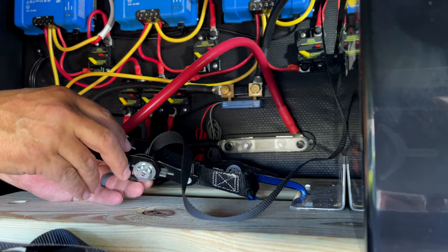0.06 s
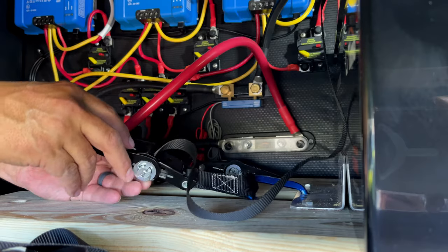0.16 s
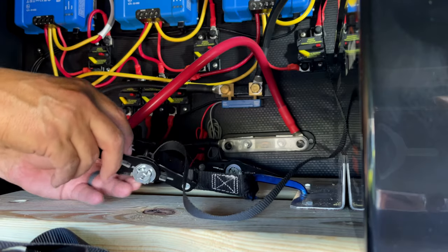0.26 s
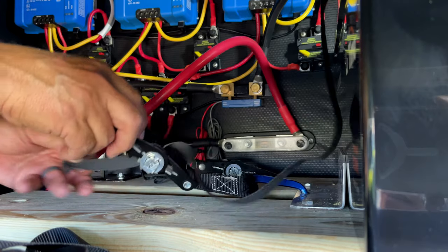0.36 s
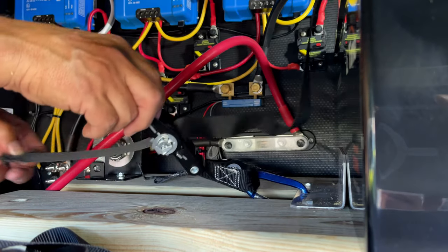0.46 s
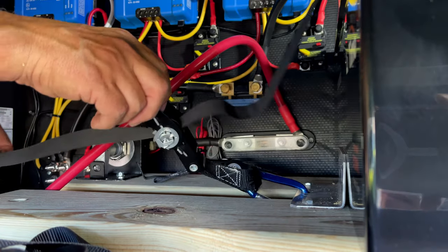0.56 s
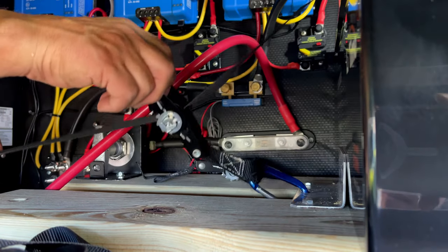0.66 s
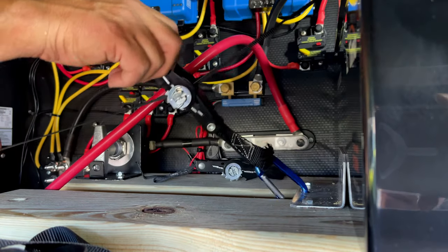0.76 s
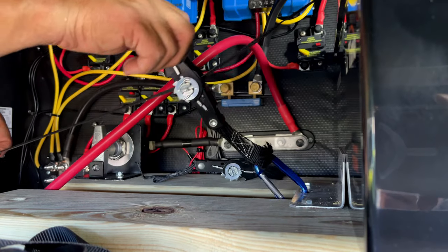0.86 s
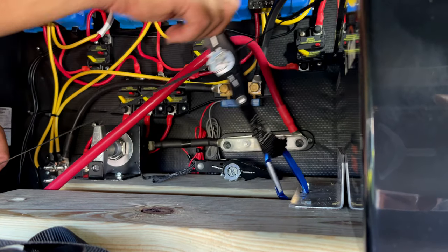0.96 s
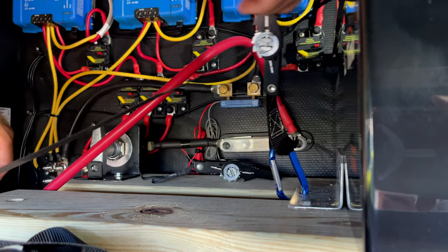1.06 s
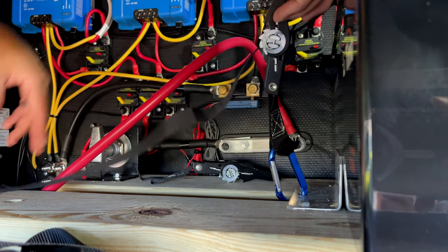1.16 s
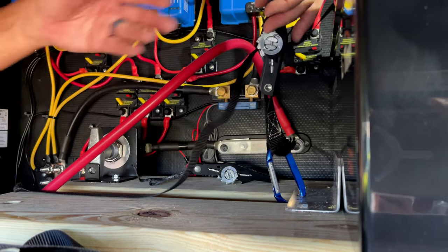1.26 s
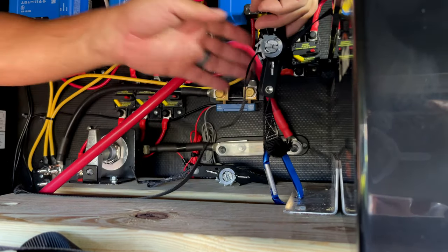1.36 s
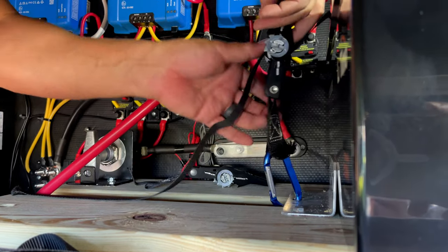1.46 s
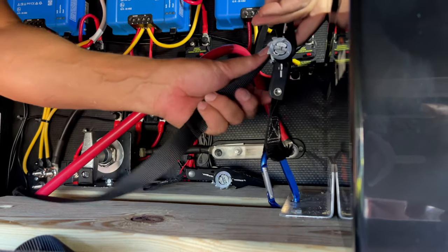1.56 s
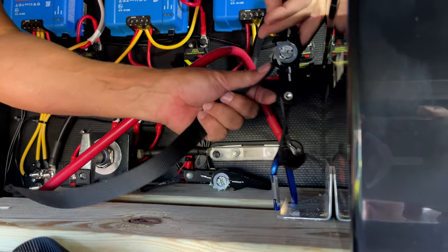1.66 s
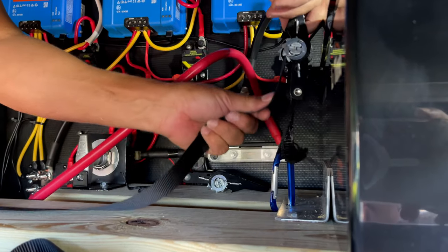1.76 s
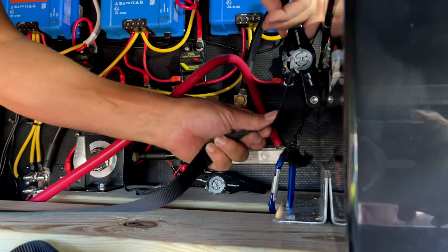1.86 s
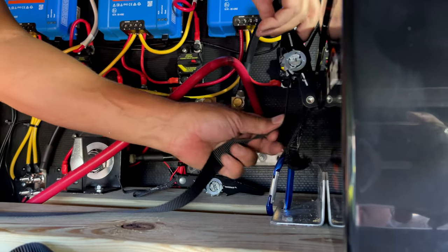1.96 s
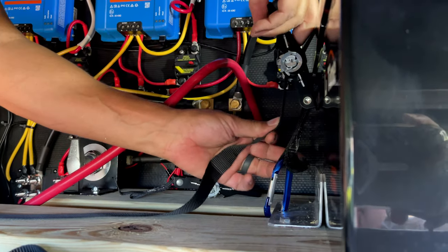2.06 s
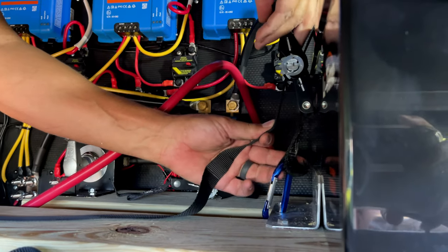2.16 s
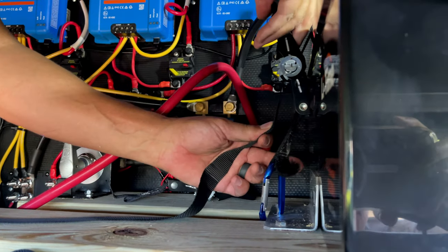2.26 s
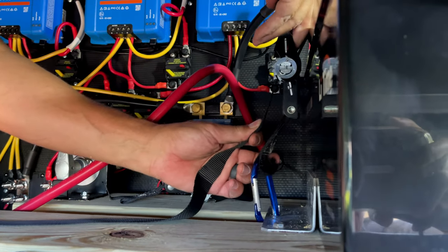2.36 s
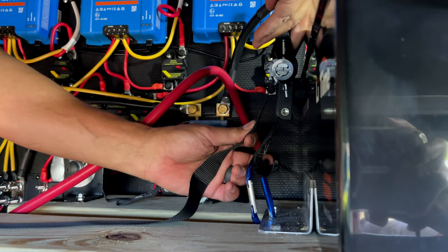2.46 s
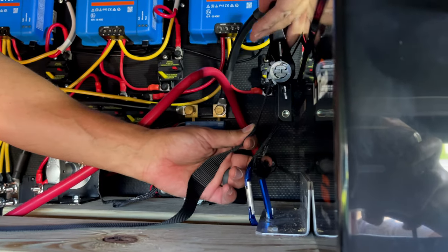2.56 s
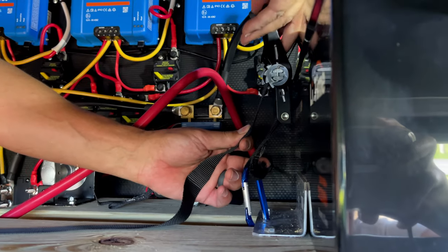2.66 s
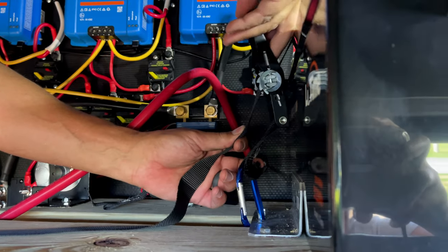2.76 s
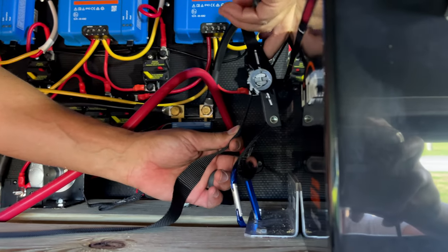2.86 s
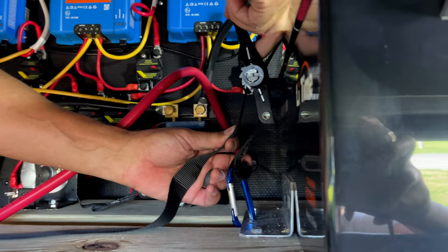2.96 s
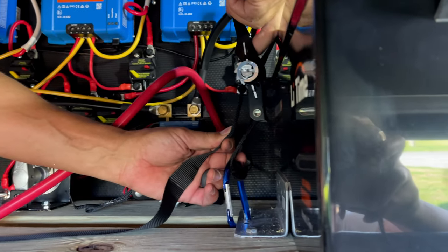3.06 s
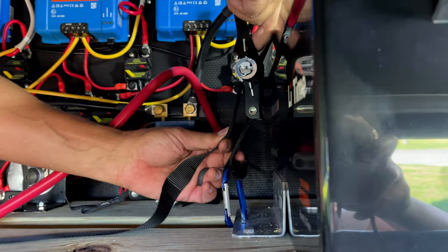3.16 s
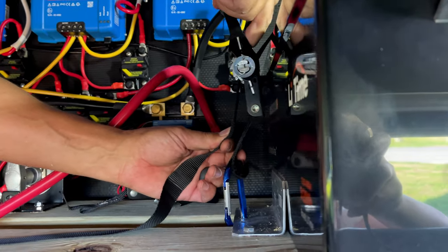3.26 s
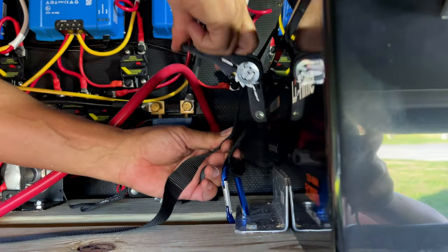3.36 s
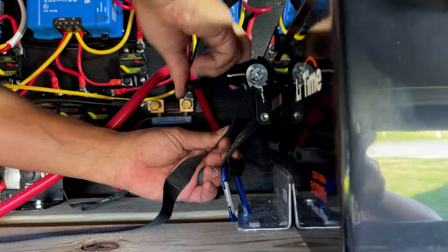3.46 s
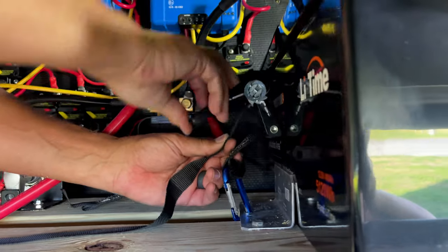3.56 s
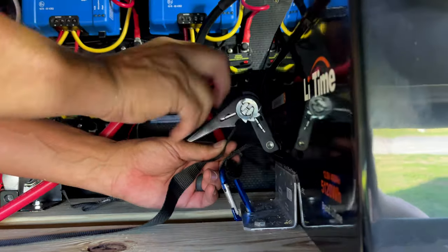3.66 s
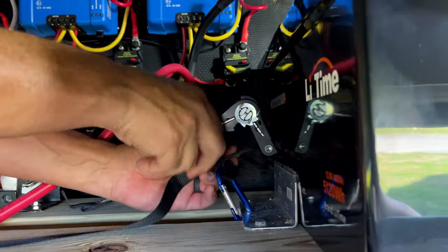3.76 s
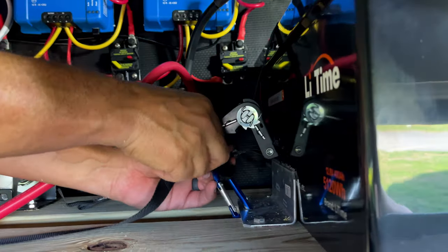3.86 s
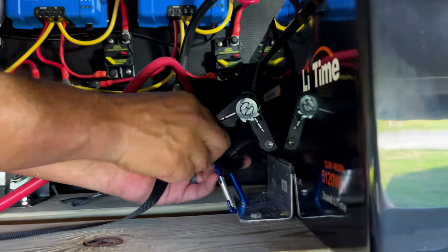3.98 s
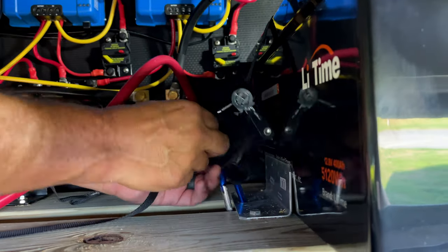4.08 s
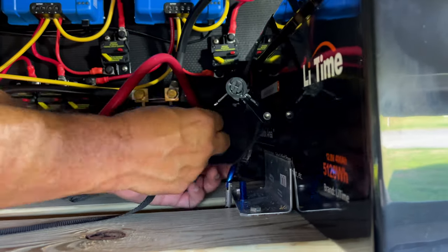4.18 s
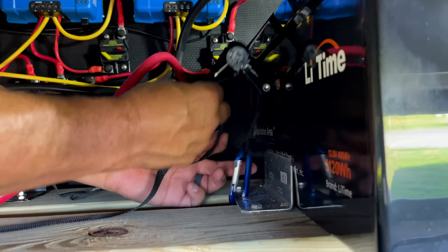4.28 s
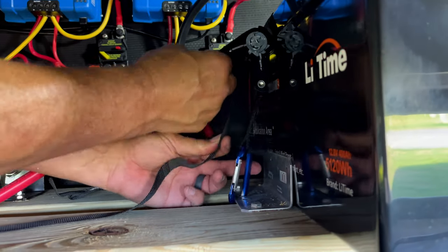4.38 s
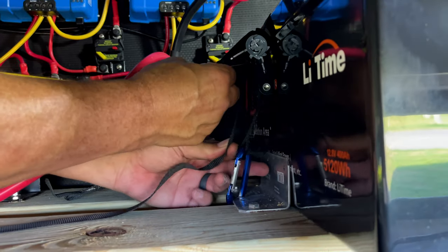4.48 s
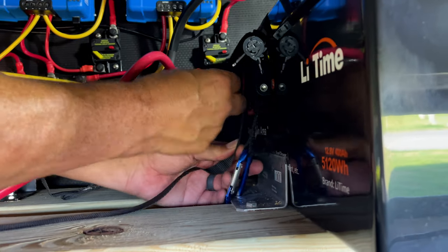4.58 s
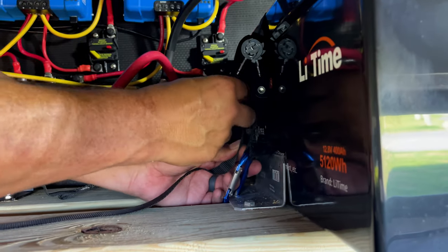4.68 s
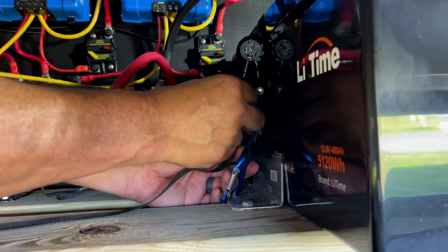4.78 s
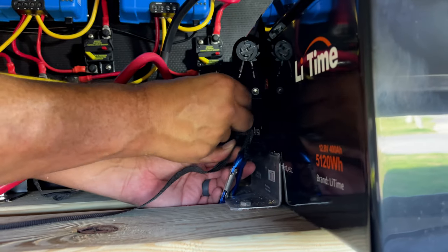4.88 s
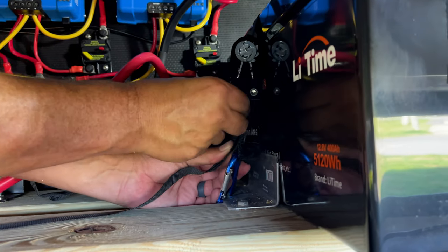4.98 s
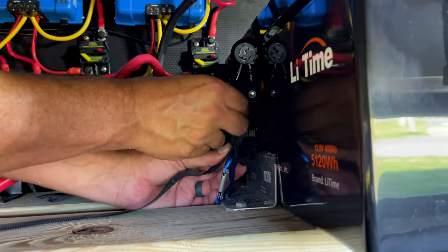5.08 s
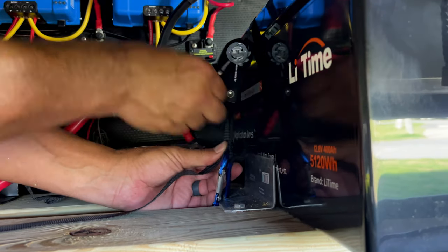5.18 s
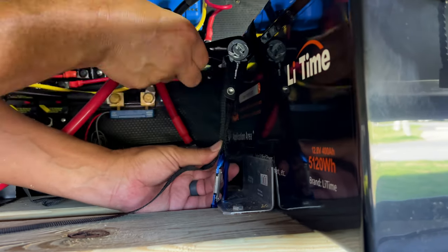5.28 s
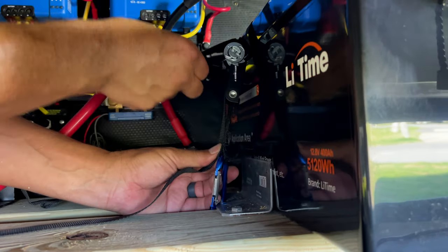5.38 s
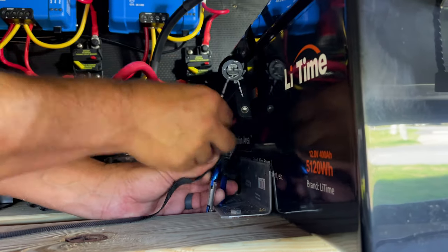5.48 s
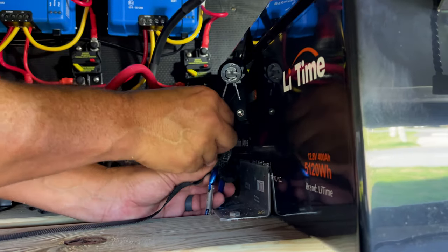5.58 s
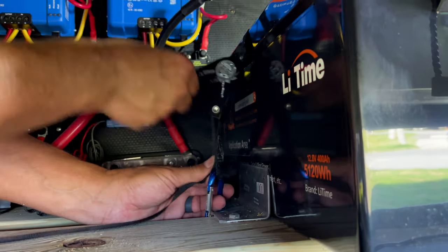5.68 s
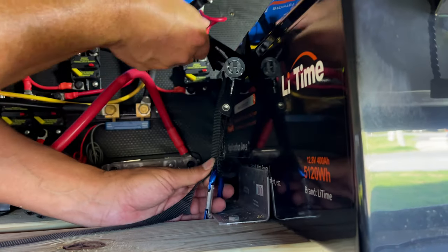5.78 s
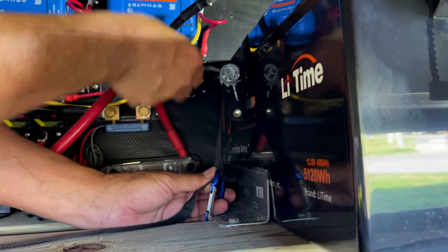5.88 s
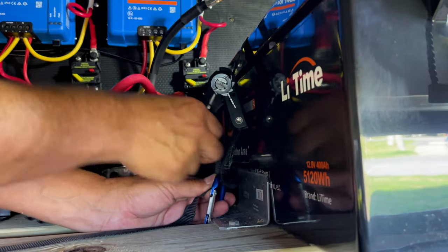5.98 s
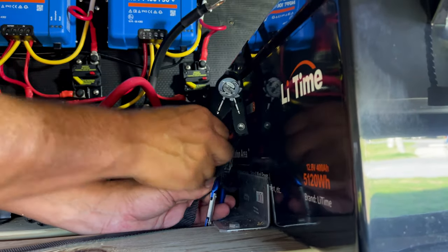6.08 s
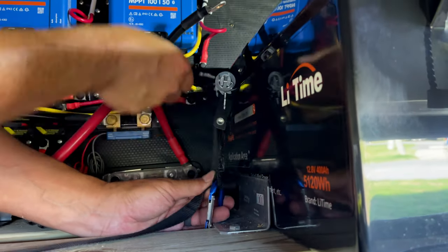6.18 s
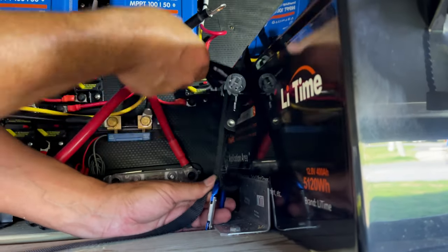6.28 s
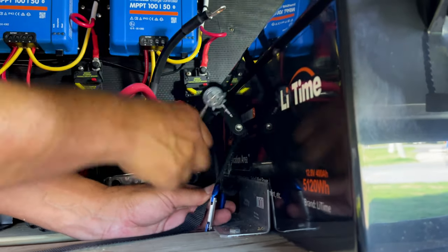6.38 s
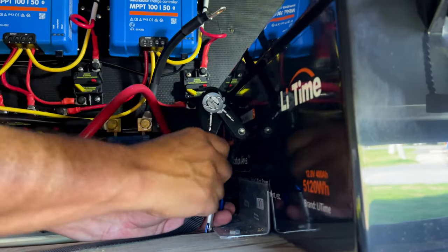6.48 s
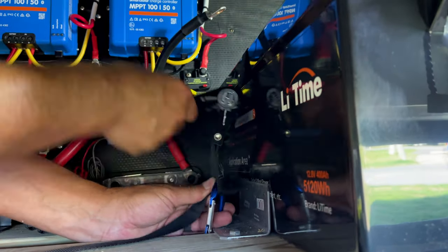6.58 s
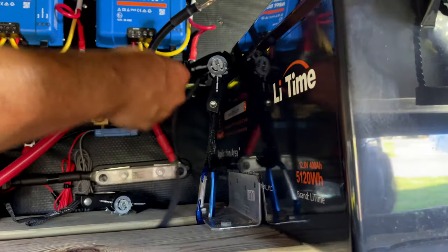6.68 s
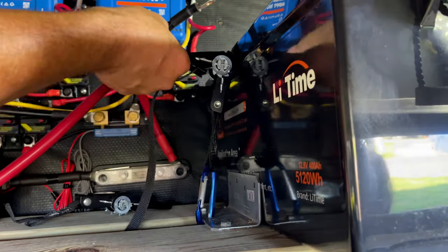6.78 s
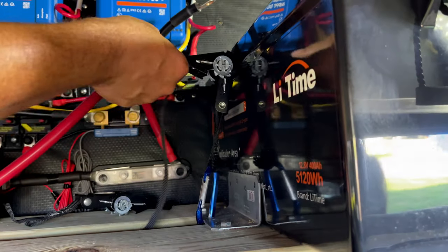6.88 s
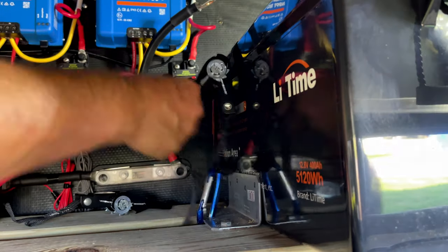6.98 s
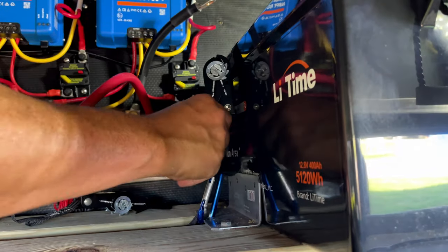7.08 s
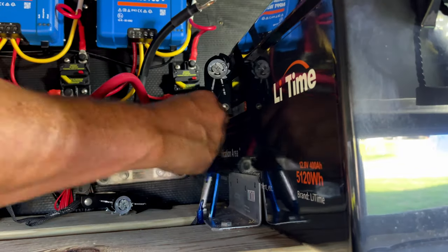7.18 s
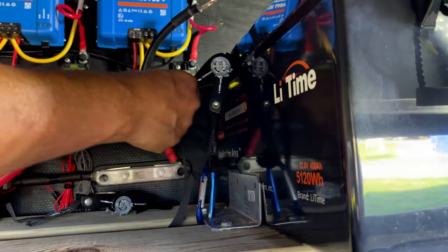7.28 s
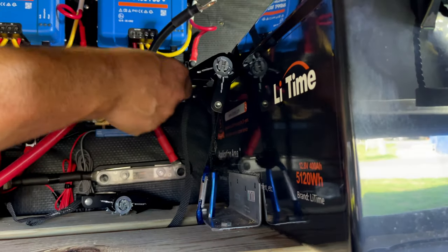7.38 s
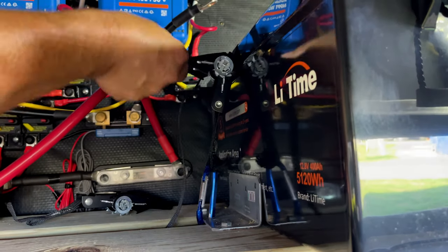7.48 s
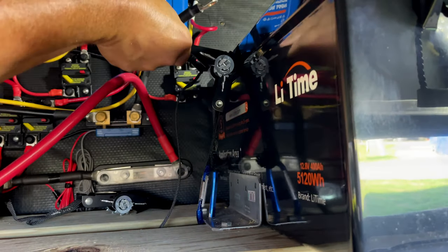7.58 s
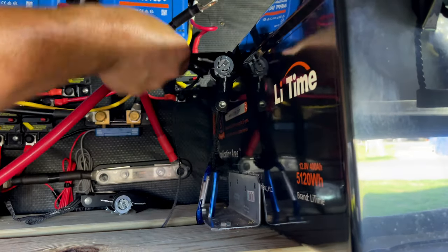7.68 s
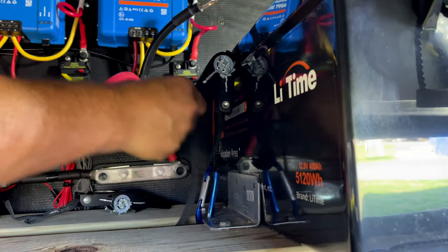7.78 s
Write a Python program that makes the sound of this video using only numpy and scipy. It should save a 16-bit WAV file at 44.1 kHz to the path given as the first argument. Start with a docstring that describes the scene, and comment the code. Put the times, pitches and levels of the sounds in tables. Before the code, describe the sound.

A ratchet strap is hooked up and tightened at arm's reach. First come sparse knocks, two of them firm and woody, and short grainy rasps of webbing. A near-quiet stretch follows, then a few crisp clicks and a hard hook clank. From there the pawls snap over the teeth in fast, dry strokes to the end, thudding the boards beneath. Close mono sound, slight hollow boom, quiet outdoor air and low hum.

```python
"""In a small equipment compartment a ratchet strap is hooked to a steel bracket and cranked tight, close to the microphone.
The hook knocks, slack webbing hisses through the spool, then sprung pawls snap over the teeth in quick strokes
and the taut strap passes thuds into the wooden floor. Something hums far off and a faint thin whistle wavers.
Bursts of force ring filters shaped like the metal and boards; shaped noise makes the hiss, rub, air and hum,
and two sines make the whistle."""
import sys
import numpy as np
from scipy import signal
from scipy.fft import rfft, irfft
from scipy.io import wavfile

SR = 44100
rng = np.random.default_rng(int(sys.argv[2]) if len(sys.argv) > 2 else 0)


def digitize_waveform(pressure):
    """Quantize a signal to 16-bit integers and store it at the path in sys.argv[1].

    Rows of a 2-D input are taken as channels; values are limited to [-1, 1].
    """
    field = np.atleast_2d(pressure).T
    bounded = np.clip(field, -1, 1)
    quanta = np.round(bounded * 32767).astype(np.int16)
    wavfile.write(sys.argv[1], SR, quanta)


N = 345372
TIME = np.arange(N) / SR

# Table levels are relative: each layer is trimmed again where it is mixed.
# Jolts that the strap passes into the floor. Each row: start in seconds, thump in dB, body in dB.
JOLTS = [(3.3066, -45.5, -42), (3.5435, -51.5, -35.5), (4.3715, -24.5, -20.5), (4.503, -42.5, -44),
         (4.6031, -33.5, -28.5), (4.679, -47, -45), (4.7679, -44, -37), (4.8015, -34, -41),
         (5.108, -53, -41), (5.251, -34.5, -33), (5.3179, -49, -43), (5.4245, -44, -36),
         (5.4732, -43.5, -27), (5.5496, -30, -29), (5.6576, -37, -30.5), (5.8013, -32, -26),
         (5.9409, -43, -29), (6.137, -32, -26), (6.2709, -29, -24), (6.3698, -39, -34.5),
         (6.5487, -40, -35.5), (6.579, -36.5, -46), (6.7035, -40.5, -34), (7.0056, -28, -28),
         (7.045, -40, -35.5), (7.238, -47, -48.5), (7.3474, -48, -43), (7.3881, -49, -34.5),
         (7.5485, -60, -30.5), (7.7009, -35.5, -39.5), (7.7846, -38.5, -28.5)]
# Swings of the handle, each winding on a little webbing.
# Each row: middle in seconds, length in seconds, webbing in dB, plate rub in dB.
HANDLE_SWINGS = [(3.468, 0.074, -36.5, -69.5), (3.632, 0.11, -48.5, -73), (3.836, 0.067, -55, -67),
                 (4.11, 0.054, -37.5, -69.5), (4.312, 0.13, -42.5, -59), (4.576, 0.097, -52, -60.5),
                 (4.8, 0.17, -63.5, -61.5), (5.219, .09, -51, -72), (5.469, 0.097, -61.5, -48),
                 (5.677, 0.069, -43.5, -47), (5.917, 0.1, -52, -52.5), (6.178, 0.098, -45, -53.5),
                 (6.418, 0.137, -46, -52), (6.687, 0.26, -52, -53), (6.982, 0.23, -59, -53.5),
                 (7.234, 0.097, -52.5, -57.5), (7.368, 0.055, -44.5, -57), (7.518, 0.052, -40, -68),
                 (7.738, 0.12, -66, -54.5)]
# Resonances of the buckle. Each row: centre in Hz, width in Hz, lift in dB.
BUCKLE_RESONANCES = [(1673, 240, 0.5), (1970, 33, -1), (2260, 32, -1), (2900, 100, 0), (5040, 260, 4.5),
                     (5650, 130, 3), (6230, 29, 3), (6760, 72, 8), (9070, 370, 1), (10920, 1200, 0)]
# Broad colour of the buckle. Each row: frequency in Hz, level in dB.
BUCKLE_TONE = [(800, 3.5), (1600, -2), (2600, -3.5), (4000, -5.5), (5200, -3), (7000, -8.5), (9000, -1.5),
               (10500, 4), (11400, 4), (12300, -5.5), (13500, -17), (16000, -22.5)]


def ratchet():
    """A pawl drops off a tooth with a bright tick; harder snaps and jolts also ring the side plates and the frame."""
    # Pawls and handle snapping on the ratchet wheel.
    # Each row: start in seconds, frame clack in dB, plate ring in dB, pawl tick in dB.
    clicks = [(3.2983, -56, -36, -29), (3.3075, -68, -24.5, -20.5), (3.4292, -52, -40.5, -32),
              (3.4473, -55, -45, -32.5), (3.475, -46, -26, -21), (3.5422, -28.5, -41, -34),
              (3.627, -67, -40.5, -28), (4.3699, -27.5, -41, -38.5), (4.4352, -40.5, -60, -69),
              (4.5763, -35, -32, -29), (4.6025, -27.5, -26, -20), (4.7506, -38, -31.5, -29),
              (4.768, -38, -33.5, -33.5), (4.7996, -31.5, -35.5, -41), (4.901, -44, -55, -60),
              (5.204, -45, -42.5, -47), (5.239, -38.5, -31.5, -26), (5.249, -27, -26, -17),
              (5.451, -29, -43, -35.5), (5.4729, -18, -21.5, -22.5), (5.5193, -40, -30.5, -26.5),
              (5.6432, -53, -37, -37), (5.6577, -18.5, -19.5, -23), (5.6737, -50, -26, -22),
              (5.7306, -57, -28, -28), (5.7406, -36, -23, -18), (5.8008, -31, -33.5, -35.5),
              (5.9067, -39.5, -36, -31), (5.9308, -38, -34, -24), (5.9409, -20, -21.5, -25.5),
              (5.9845, -46, -31, -26.5), (5.9995, -30, -24, -19), (6.1445, -33.5, -27.5, -25),
              (6.2005, -56, -30, -26), (6.2085, -41, -22, -19.5), (6.27, -40, -24.5, -29.5),
              (6.3545, -47, -37, -35.5), (6.3691, -22, -24, -25.5), (6.408, -43, -35, -29.5),
              (6.4316, -38.5, -32.5, -21), (6.4816, -54, -36, -30), (6.532, -43, -42, -35),
              (6.5504, -39, -29.5, -31), (6.5775, -27, -33, -27), (6.634, -45, -30, -23.5),
              (6.687, -33, -28, -25.5), (6.7035, -34, -39, -36), (6.7655, -61, -46, -41.5),
              (6.823, -44, -44, -35.5), (6.865, -68, -39, -38), (6.927, -57, -39.5, -41),
              (6.9506, -54, -38, -34.5), (6.984, -34, -35, -32), (7.0042, -22.5, -20, -31),
              (7.0424, -30.5, -22, -21.5), (7.233, -47, -39.5, -38.5), (7.3762, -38, -29, -37),
              (7.3848, -30.5, -22.5, -21.5), (7.533, -40, -35, -26), (7.5473, -26, -20, -23.5),
              (7.7011, -42, -38, -36.5), (7.7706, -30, -23.5, -23.5), (7.7841, -28, -22, -20.5)]
    start, clack_db, ring_db, tick_db = np.transpose(clicks)
    jolt_start, _, jolt_db = np.transpose(JOLTS)
    frame = ringing(BUCKLE_TONE, BUCKLE_RESONANCES, lo_hz=1090, hi_hz=3230, patchy_db=2.5)
    plates = ringing(BUCKLE_TONE, BUCKLE_RESONANCES, lo_hz=3380, hi_hz=7680, patchy_db=2)
    spring_tone = [(4300, -32), (5200, -6.5), (5650, 0.5), (6100, -9), (7200, -29.5)]
    spring = ringing(spring_tone, BUCKLE_RESONANCES)
    pawl = ringing(BUCKLE_TONE, BUCKLE_RESONANCES, lo_hz=7300, hi_hz=17000, patchy_db=1.5)

    # every jolt shakes the frame too, a little under its body level
    frame_start = np.r_[start, jolt_start]
    frame_db = np.r_[clack_db, jolt_db - 6.5]
    clack = blows(frame_start, frame_db, frame, t60=0.081, crack=0.23, crack_s=0.024, push=0.057)
    ring = blows(start, ring_db, plates, t60=0.063, crack=0.11, crack_s=0.0021, contact=0.00025)
    # the pawl spring pings near 5.6 kHz; its level in dB rises half as fast as the plate ring
    ping_db = ring_db / 2 - 23.5
    ping = blows(start, ping_db, spring, t60=0.066, crack=0.29, crack_s=0.0033, contact=0.00055)
    tick = blows(start, tick_db, pawl, t60=0.077, crack=1.0, crack_s=0.0038, contact=0.000072)
    return undb(-1.5) * clack + undb(-1) * ring + ping + undb(1.37) * tick


def handle_rub():
    """As the handle swings its steel plates stick and slip in tiny steps that ring the buckle, and loose parts tick."""
    middle, length, _, rub_db = np.transpose(HANDLE_SWINGS)
    swing = movements(middle, length, rub_db)
    slips = rng.standard_normal(N) * undb(1.8 * walk(350)) * swing
    rub = resonate(slips, BUCKLE_TONE, BUCKLE_RESONANCES, lo_hz=1100, hi_hz=6200, patchy_db=3.5)

    # ticks at uneven gaps, 1/28 s nominal, around 7 dB over the rub's gain
    gaps, sizes = rng.uniform(-0.83, 1, size=(400, 2)).T
    start = middle[0] + np.cumsum(1 + gaps) / 28
    tick_db = 20 * np.log10(np.interp(start, TIME, swing)) + 7 + 6 * sizes
    heard = (start < TIME[-1]) & (tick_db > -70)
    loose = ringing(BUCKLE_TONE, BUCKLE_RESONANCES, lo_hz=3500, hi_hz=15000, patchy_db=-2.5)
    rattle = blows(start[heard], tick_db[heard], loose, t60=.06, crack=.8, crack_s=.003)
    return undb(0.5) * rub + rattle


def floor_thuds():
    """The taut strap jerks the load and the boards under it; the tension damps them quickly."""
    # Broad colour of the strapped load and floor. Each row: frequency in Hz, level in dB.
    floor_tone = [(100, -3.5), (160, -5.5), (280, -7.5), (600, -6), (900, -13), (1400, -21)]
    # Their resonances. Each row: centre in Hz, width in Hz, lift in dB.
    floor_resonances = [(187.4, 13, 7.5), (219.8, 23.5, 11.5), (293.2, 56, 14), (553, 14, 5),
                        (614, 110, 2.5), (910, 17, 2.5)]
    start, thump_db, body_db = np.transpose(JOLTS)
    boards = ringing(floor_tone, floor_resonances, lo_hz=130, hi_hz=430)
    load = ringing(floor_tone, floor_resonances, lo_hz=400, hi_hz=1080)
    thump = blows(start, thump_db, boards, t60=.1, crack=0.15, crack_s=.012, push=0.43, span=0.013)
    body = blows(start, body_db, load, t60=.1, crack=0.033, crack_s=0.012, push=0.5, span=0.023)
    return undb(4.0) * thump + undb(1.0) * body


def hook():
    """The steel hook drags and knocks on its bracket, which is screwed to hollow boards."""
    # Hook and loose buckle knocking about.
    # Each row: start in seconds, body in dB, clank in dB, scrape in dB, contact time in seconds.
    knocks = [(0.086, -52, -50.5, -70, 0.0073), (0.1804, -45.5, -42, -45, 0.003),
              (0.5185, -42, -47.5, -50, .001), (0.561, -55, -45, -52, 0.00069),
              (0.6755, -43.5, -62, -65, 0.0061), (0.7332, -15.5, -34, -30.5, 0.0018),
              (0.755, -27, -48, -34.5, 0.003), (1.1323, -40, -55, -78, 0.0021),
              (1.162, -45, -64, -81, .004), (1.326, -41, -65, -80, 0.016), (1.346, -44, -65, -82, 0.0065),
              (1.532, -45, -60, -67, 0.0031), (1.657, -45, -49, -46, 0.00056),
              (1.678, -46, -38.5, -37, 0.0013), (1.714, -33, -31.5, -31, .018),
              (1.728, -24.5, -26.5, -28, 0.0008), (1.7687, -20, -54, -24.5, 0.0019),
              (1.781, -26.5, -49, -34.5, 0.0013), (1.879, -38, -48, -73, 0.0006),
              (1.958, -51.5, -63, -64, .004), (2.128, -57, -49, -52, .0008),
              (2.1793, -45.5, -44.5, -64, 0.0013), (2.2029, -41, -38.5, -51, 0.00032),
              (2.217, -45.5, -48, -41.5, .0007), (2.2615, -45.5, -42.5, -33, 0.00092),
              (2.849, -49, -55, -82, 0.00076), (3.9331, -44, -68, -62, 0.00032),
              (4.0583, -45, -50.5, -45, 0.00081), (4.094, -48, -37.5, -56, 0.0016),
              (4.1116, -33.5, -34.5, -51, 0.0019), (4.2531, -52, -50.5, -46.5, .0006),
              (4.2717, -54, -40, -50, 0.0022), (4.2976, -25.5, -22.5, -19.5, 0.00052)]
    # Broad colour of the hook and bracket. Each row: frequency in Hz, level in dB.
    hook_tone = [(120, 2.5), (300, 1), (700, 10.5), (1100, -4.5), (2000, -9.5), (4500, -16.5),
                 (7000, -25.5), (8500, -31), (11000, -25), (12500, -42), (16000, -61)]
    # Their resonances. Each row: centre in Hz, width in Hz, lift in dB.
    hook_resonances = [(266.2, 22, 9.5), (402, 30, 5.5), (472, 21, 3), (547, 5.1, 6.5), (613, 29, 1.5),
                       (744, 73, 3.5), (774, 19, 6), (893, 55, 4), (1388, 76, 6), (1720, 35, 7.5),
                       (1904, 190, 9.5), (3060, 63, 1.5), (3580, 40, 10), (4050, 90, 0.5), (4400, 170, 3.5),
                       (5000, 110, 1.5), (6440, 40, 3.5)]
    start, body_db, clank_db, scrape_db, contact = np.transpose(knocks)
    boards = ringing(hook_tone, hook_resonances, lo_hz=162, hi_hz=483)
    hollow = ringing(hook_tone, hook_resonances, lo_hz=490, hi_hz=940)
    bracket = ringing(hook_tone, hook_resonances, lo_hz=1023, hi_hz=2740, patchy_db=3)
    steel = ringing(hook_tone, hook_resonances, lo_hz=3620, hi_hz=4050)
    edge = ringing(hook_tone, hook_resonances, lo_hz=3500, hi_hz=13950, patchy_db=4)

    # the boards answer every knock
    thump = blows(start, body_db - 4.5, boards, t60=0.3, crack=0.56, crack_s=0.019,
                  push=0.35, contact=contact, span=0.0022)
    body = blows(start, body_db, hollow, t60=0.16, crack=1.2, crack_s=0.0068,
                 push=0.15, contact=contact, span=0.045)
    # the metal takes up the force in half the contact time
    clank = blows(start, clank_db, bracket, t60=0.098, crack=0.51, crack_s=0.0012,
                  contact=contact / 2, span=0.026)
    # the hook itself sings near 3.8 kHz
    song = blows(start, body_db - 24, steel, t60=0.059, crack=0.56, crack_s=0.0062,
                 contact=contact / 2, span=0.027)
    scrape = blows(start, scrape_db, edge, t60=0.082, crack=0.93, crack_s=0.0044,
                   contact=contact / 2, span=0.019)
    return thump + undb(-2.6) * body + undb(1.77) * clank + song + undb(-3.0) * scrape


def webbing():
    """Woven threads catch and slip on the metal: a grainy hiss, which buzzes when the ribs pass quickly."""
    # Slack webbing drawn through the buckle and the hand.
    # Each row: middle in seconds, length in seconds, level in dB.
    draws = [(0.44, 0.45, -56), (0.712, 0.12, -46.5), (0.966, 0.15, -43), (1.21, 0.13, -61),
             (1.534, 0.26, -54.5), (1.72, 0.17, -42), (1.916, 0.13, -61.5), (2.19, .15, -59),
             (2.715, 0.11, -60), (3.142, 0.88, -64)]
    # Quick tugs that buzz the weave over the spool. Each row: middle in seconds, length in seconds, level in dB.
    tugs = [(0.47, 0.13, -45), (0.982, .035, -38), (1.038, 0.063, -36.5)]
    # Broad colour of the webbing. Each row: frequency in Hz, level in dB.
    webbing_tone = [(710, -32.5), (1200, 8), (1540, 10.5), (1660, 4.5), (2530, 6.5), (2760, 3), (2950, 3.5),
                    (4600, 3.5), (5530, 2.5), (6230, 0), (7490, -1.5), (11100, 7.5), (16000, -48)]
    middle, length, wind_db, _ = np.transpose(HANDLE_SWINGS)
    resting = undb(-75)  # the webbing shifts in the hand all the time
    sliding = movements(*np.transpose(draws)) + movements(middle, length, wind_db) + resting
    grain = undb(1.07 * walk(420) + 1.55 * walk(30))
    slide = resonate(grain * rng.standard_normal(N) * sliding, webbing_tone, lo_hz=2060, patchy_db=3.5)

    rib_hz = 260 * (1 + 0.037 * walk(18))
    # one impulse for each rib that passes, scaled to unit power
    ribs = np.diff(np.floor(np.cumsum(rib_hz) / SR), prepend=0) * np.sqrt(SR / rib_hz)
    rasp = 0.29 * ribs + 0.38 * rng.standard_normal(N)
    pull = resonate(rasp * movements(*np.transpose(tugs)), webbing_tone, lo_hz=1370, hi_hz=5170)
    return undb(-6.5) * slide + undb(-1.5) * pull


def whistle():
    """A faint, thin note, two sines an octave apart, that flutters in level and wavers in pitch."""
    # The note comes in two stretches. Each row: time in seconds, pitch in Hz, level in dB.
    whistle_path = [(2.82, 4530, -87), (2.9, 4260, -65), (3.018, 4080, -61), (3.22, 3900, -60.5),
                    (3.35, 4050, -58.5), (3.97, 4150, -61), (4.25, 4230, -77), (4.45, 4320, -61),
                    (4.75, 4230, -61.5), (5.12, 4420, -59.5), (5.4, 4360, -68)]
    s, path_hz, path_db = np.transpose(whistle_path)
    pitch_hz = np.interp(TIME, s, path_hz) * (1 + .005 * walk(600))
    phase = 2 * np.pi * np.cumsum(pitch_hz) / SR
    level = undb(np.interp(TIME, s, path_db, left=-120, right=-120) + 1.4 * walk(60))
    return undb(-2.5) * level * (np.sin(phase) + undb(-9.5) * np.sin(2 * phase))


def outdoors():
    """Soft open air over a distant, unsteady hum, both noise shaped by broad colours."""
    # Broad colour of the air. Each row: frequency in Hz, level in dB.
    air_tone = [(12, -58), (20, -12.5), (49, 1.5), (77, -1.5), (127, -2.5), (347, -8), (422, -19),
                (472, -11), (542, -15), (1090, -18.5), (4060, -38.5), (7110, -51), (10800, -86.5),
                (13200, -83.5), (16000, -85)]
    # Level of the distant hum. Each row: time in seconds, level in dB.
    hum_level = [(0.0, -52), (0.7, -49), (2.6, -45.5), (5.1, -47.5), (5.7, -53), (6.7, -54.5), (7.83, -48)]
    air = resonate(rng.standard_normal(N), air_tone, lo_hz=30) * undb(0.5 * walk(2.57))
    hum_tone = [(40, -9.5), (60, 1), (90, -5.0)]
    hum_resonances = [(59.0, 36, 4.7), (72.5, 10, 3.2)]
    hum = resonate(rng.standard_normal(N), hum_tone, hum_resonances, lo_hz=44, hi_hz=86)
    return undb(-48.0) * air + hum * curve(hum_level)


def compartment(x, t60, lo_hz, hi_hz):
    """The hollow space keeps one band of a sound ringing: a decaying noise tail, band-passed."""
    t = TIME[:SR]
    tail = rng.standard_normal(SR) * undb(-60 * t / t60) * (1 - np.exp(-t / .01))
    wet = signal.fftconvolve(x, tail / np.linalg.norm(tail))[:N]
    band = signal.butter(2, [lo_hz, hi_hz], "band", fs=SR, output="sos")
    return signal.sosfilt(band, wet)


def blows(times, dbs, body, t60, crack, crack_s, push=0, contact=0, span=0.0061, size=16384):
    """A push, a dense crack and a scatter of reflections ring the body; dbs set the RMS of the first span seconds."""
    out = np.zeros(N + size)
    t = TIME[:size]
    body = rfft(body, size)
    fade = undb(-60 * t / t60) * (1 + crack * np.exp(-t / crack_s))
    for start, db, rise in zip(times, dbs, contact + np.zeros(len(times))):
        # a longer contact softens the onset
        shape = fade * (1 - np.exp(-(t + 1 / SR) / max(rise, 1 / SR)))
        force = rng.standard_normal(size) * shape / np.linalg.norm(shape)
        force[0] += push
        blow = irfft(rfft(force) * body)
        i = int(start * SR)
        out[i:i + size] += blow * undb(db) / np.sqrt(np.mean(blow[t < span] ** 2))
    return out[:N]


def ringing(colour, modes=(), lo_hz=15, hi_hz=20000, patchy_db=0, size=16384):
    """Causal impulse response of unit power: a broad colour, lifted at each resonance, between two steep edges."""
    f = np.maximum(np.arange(size // 2 + 1) * SR / size, 1)
    points = np.array(colour)
    db = np.interp(np.log(f), np.log(points[:, 0]), points[:, 1])
    for hz, width, lift in modes:
        db = db + lift / (1 + (2 * (f - hz) / width) ** 2)
    # countless minor resonances roughen the response, the same for every blow
    db = db + patchy_db * np.interp(f / 55, np.arange(512), rng.standard_normal(512))
    gain = undb(db) / np.sqrt((1 + (lo_hz / f) ** 8) * (1 + (f / hi_hz) ** 8))
    # folding the cepstrum gives minimum phase, so nothing sounds ahead of the blow
    cepstrum = irfft(np.log(gain + gain.max() * 1e-5))[:size // 2]
    cepstrum[1:] *= 2
    response = irfft(np.exp(rfft(cepstrum, size)))
    return response / np.linalg.norm(response)


def resonate(x, colour, modes=(), **edges):
    """Passes a running sound through a resonant body."""
    return signal.fftconvolve(x, ringing(colour, modes, **edges))[:N]


def movements(middles, lengths, dbs):
    """Gain over time of hand movements that each swell and die away, 9 dB weaker at their two ends."""
    return sum(undb(db - 9 * np.minimum((2 * (TIME - middle) / length) ** 2, 10))
               for middle, length, db in zip(middles, lengths, dbs))


def walk(rate):
    """Smooth chance that takes a new value rate times a second."""
    knots = rng.standard_normal(size=8192)
    return 4.2 * np.interp(TIME * rate, np.arange(len(knots)), knots)


def curve(rows):
    """Gain over time from rows of seconds and dB."""
    return undb(np.interp(TIME, *np.transpose(rows)))


def undb(db):
    """Decibels to gain."""
    return 10 ** (np.asarray(db) / 20)


def scene():
    """The strap works within arm's reach inside the compartment, over the whistle, the air and the hum."""
    cranking = ratchet() + handle_rub() + floor_thuds()
    knocking = hook()
    boom = undb(-7.5) * compartment(knocking, t60=0.99, lo_hz=207, hi_hz=330)
    after_ring = undb(-16.5) * compartment(cranking, t60=0.21, lo_hz=263, hi_hz=2040)
    strap = cranking + knocking + boom + after_ring + webbing()
    return (strap + whistle() + outdoors())[None]


def record(dry):
    """The recorder rounds the loudest peaks and cuts the top above 15.8 kHz."""
    ceiling = .8  # full scale is 1
    rounded = ceiling * np.tanh(dry / ceiling)
    top_cut = signal.ellip(8, .2, 70, 15800, fs=SR, output="sos")
    return signal.sosfilt(top_cut, rounded)


dry = scene()
out = record(dry)
digitize_waveform(out)
```